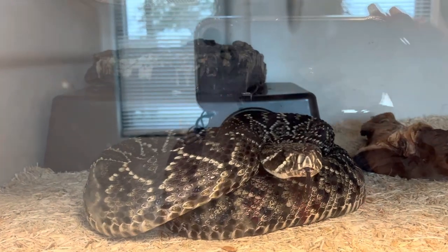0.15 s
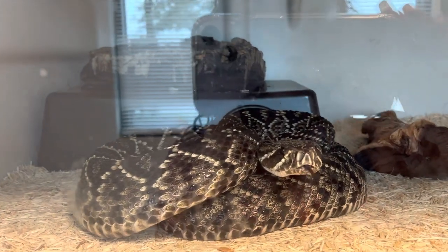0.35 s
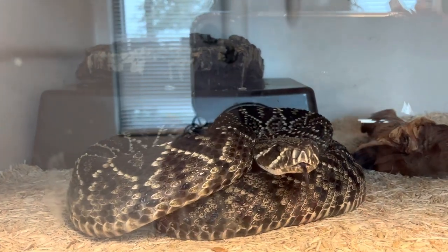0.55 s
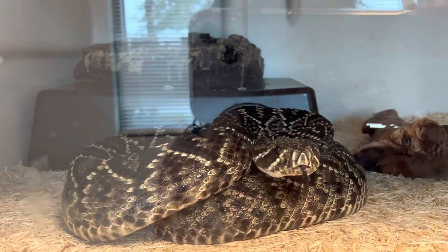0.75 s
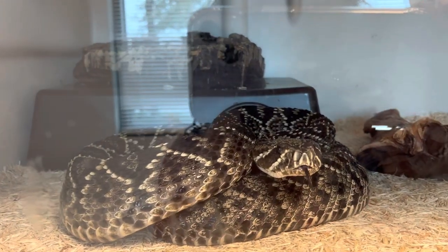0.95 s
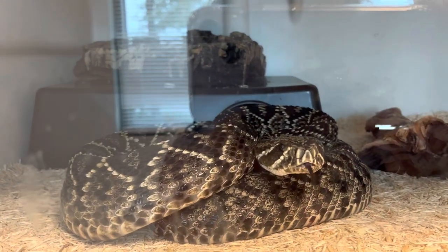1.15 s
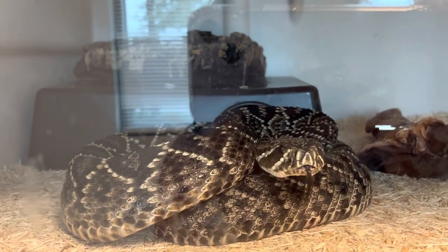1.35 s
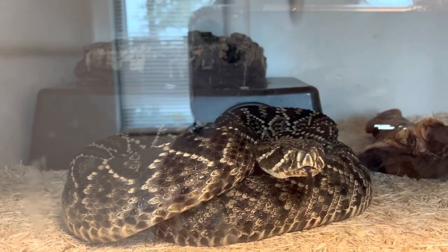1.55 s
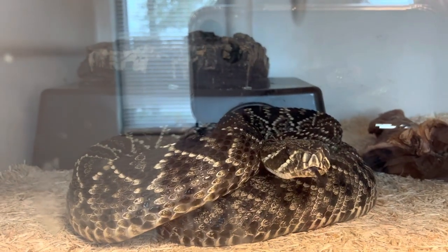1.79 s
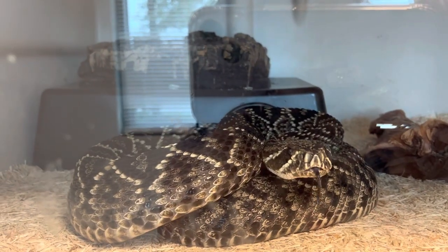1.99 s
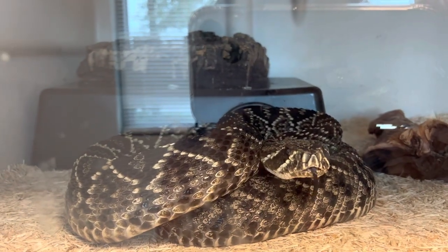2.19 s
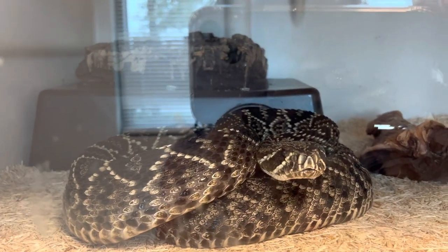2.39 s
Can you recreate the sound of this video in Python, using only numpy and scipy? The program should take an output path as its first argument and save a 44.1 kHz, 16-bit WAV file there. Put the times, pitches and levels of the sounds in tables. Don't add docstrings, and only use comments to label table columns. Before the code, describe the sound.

A rattlesnake's tail rattles without pause, a fast dry fluttering buzz close up in a glass tank

```python
import sys
import numpy as np
from scipy import signal
from scipy.fft import rfft, irfft, next_fast_len
from scipy.io import wavfile
from scipy.ndimage import uniform_filter1d

SR = 44100
rng = np.random.default_rng(int(sys.argv[2]) if len(sys.argv) > 2 else 0)


def store_wav(level_fs):
    pcm = np.round(np.clip(np.atleast_2d(level_fs), -1, 1) * 32767)
    wavfile.write(sys.argv[1], SR, pcm.T.astype(np.int16))


def volts_from_decibels(level):
    exponent = np.asarray(level, float) / 20
    return 10 ** exponent


N = 107163

# pitch_hz, level_db
HUM_TONES = [(120, -66), (180, -72), (300, -79), (420, -79), (480, -83)]
# frequency_hz, density_db (per Hz)
AIR_COLOUR = [(25, -37), (54, 1.5), (110, -6.5), (200, -13.5), (650, -41.5), (1050, -23), (1500, -30.5),
              (6000, -26.5)]
# pitch_hz, width_hz, level_db
DUCT_MODES = [(142.7, 11, -0.5), (162.4, 6.3, -4.5), (287.3, 9.9, -11.5), (1587, 49, -18.5)]
# frequency_hz, left_lead_rad
PORT_LEAD = [(0, 0), (550, 0), (800, -1.2), (1300, -1.4), (1800, -6.1), (3000, -5.5), (3500, -5.7),
             (4300, .4), (5200, 0), (5700, -1.9), (6300, .3), (7000, 0), (10000, -3.14), (15800, -9.42)]
# frequency_hz, left_minus_right_db
PORT_BALANCE = [(60, 0), (200, 1.5), (1300, 2.5), (2600, 0), (3300, 0), (3900, 4.5), (5300, 2), (6000, 0)]
# start_s, swings_per_s, level_db, swing_depth (times DEPTH_DB)
TAIL_EFFORT = [(0.0, 20.95, -2.2, 0.97), (0.14, 20.27, -1.7, 1.48), (0.29, 21.2, -0.4, 1.35),
               (0.43, 21.42, 0.2, 0.93), (0.57, 21.49, 0.6, 0.88), (0.71, 23.21, 0.3, 0.9),
               (0.86, 21.85, 1.7, 0.9), (1.0, 21.77, -0.1, 0.72), (1.14, 22.08, 0.8, 0.87),
               (1.29, 21.23, 0.7, 1.14), (1.43, 22.09, -0.1, 0.84), (1.57, 20.33, 0.8, 1.07),
               (1.72, 20.85, -0.4, 0.79), (1.86, 21.48, 1.0, 1.11), (2.0, 22.23, 1.3, 0.85),
               (2.14, 20.62, -0.4, 1.2), (2.29, 20.35, -0.6, 1.05), (2.43, 20.74, -1.5, 0.96)]
# start_s, level_db
HARD_CLASHES = [(0.1845, -38), (0.2289, -33.5), (0.323, -33.5), (0.383, -29), (0.5104, -32),
                (0.6545, -34.5), (0.7843, -32.5), (0.828, -35), (0.965, -34), (1.0557, -33), (1.1483, -38),
                (1.1914, -38), (1.239, -28), (1.4262, -34.5), (1.5193, -40), (1.5687, -41), (1.6168, -32),
                (1.7104, -31.5), (1.8523, -32), (1.9, -37.5), (2.0357, -36), (2.1342, -36.5), (2.228, -39),
                (2.278, -39)]
SHELL_GROUPS_HZ = [1800, 2900, 4000, 5200, 7500, 11000, 14500]
# frequency_hz, level_db
CLICK_COLOUR = [(1300, -30), (2100, -23), (2750, -2.5), (3900, -2), (5300, -3), (6300, -12), (8700, -7),
                (15500, -14)]
# pitch_hz, level_db, t60_s
RING_MODES = [(2389, -7.5, 0.039), (2725, -8, 0.05), (2798, 0, 0.047), (2930, -5, 0.065), (3127, -5, 0.054),
              (3220, -3, .06), (3610, -9.5, 0.045), (3900, 3.5, .06), (4113, -0.5, 0.05), (4390, -22, .06),
              (4630, -2.5, 0.055), (4860, -6, 0.05), (5038, 0, 0.089), (5773, 3.5, 0.072)]
PANE_DELAYS_MS = [1.3, 2.3, 3.7]
# frequency_hz, level_db
ECHO_COLOUR = [(1500, 3), (5600, 2), (6500, -19), (15000, -36)]

AIR_DB, DUCT_DB, RATTLE_DB = -49.5, -55, -43.5
RISE_AT, RISE = 0.64, 0.12
DEPTH_DB, SWING_SCATTER_DB = 10, 0.68
CLICKS_PER_S, CLICK_SCATTER_DB = 6000, 2.5
CLASH_DB, CLASH_DECAY_S = 35, 0.0036
SHARED_KNOCKS, WANDER_DB, WANDER_PER_S = 0.48, 1.5, 14
RING_DB, ECHO_DB, ECHO_T60_S = -5.5, -2.5, 0.074
PANE_GAIN = 0.59


def curve(f, table):
    hz, value = np.array(table).T
    return np.interp(np.log(f + 1), np.log(hz + 1), value)


def level(x, db):
    return x * volts_from_decibels(db) / np.sqrt(np.mean(x ** 2))


def colour(x, gain):
    n = next_fast_len(N + SR // 2)
    f = np.arange(n // 2 + 1) * SR / n
    return irfft(rfft(x, n) * gain(f), n)[..., :N]


def walk(rate):
    hold = int(SR / rate)
    steps = np.repeat(rng.standard_normal(N // hold + 1), hold)
    slewed = uniform_filter1d(uniform_filter1d(steps, hold), hold)
    return 0.93 * slewed[:N]


def ports(x):
    def half(f):
        phase = np.interp(f, *np.array(PORT_LEAD).T)
        return volts_from_decibels(curve(f, PORT_BALANCE) / 2) * np.exp(0.5j * phase)

    left = colour(x, half)
    right = colour(x, lambda f: 1 / half(f))
    return np.array([left, right])


def hum():
    t = np.arange(N) / SR
    tones = 0
    for hz, db in HUM_TONES:
        tones = tones + volts_from_decibels(db) * np.sqrt(2) * np.sin(2 * np.pi * (hz * t + rng.random()))
    return tones * np.array([[1], [-0.63]])


def room():
    noise = rng.standard_normal((4, N))
    air = colour(noise[:2], lambda f: volts_from_decibels(curve(f, AIR_COLOUR)))
    duct = colour(noise[2:], lambda f: sum(volts_from_decibels(db) / (1 + 2j * (f - hz) / width)
                                           for hz, width, db in DUCT_MODES))
    mid, side = level(air, AIR_DB) * volts_from_decibels(walk(3.15)) + level(duct, DUCT_DB)
    side = colour(side, lambda f: np.clip(f / 440, 0.05, 3) ** 0.33 * 0.3)
    return ports(mid) + side * np.array([[1], [-1]])


def swing():
    t = np.arange(N) / SR
    start, rate, effort_db, depth = np.array(TAIL_EFFORT).T
    turns = np.cumsum(np.interp(t, start, rate)) / SR + 1 - RISE_AT
    phase = turns % 1
    shape = np.minimum(phase / RISE, (1 - phase) / (1 - RISE))
    luck = rng.standard_normal(N // 1000)
    each_swing = np.interp(turns - RISE, np.arange(len(luck)), luck)
    fall_db = DEPTH_DB * np.interp(t, start, depth) * (shape - 0.5)
    return volts_from_decibels(np.interp(t, start, effort_db) + fall_db + SWING_SCATTER_DB * each_swing)


def clashes():
    t = np.arange(N) / SR
    force = 0
    for start, db in HARD_CLASHES:
        decay = np.exp(-np.maximum(t - start, 0) / CLASH_DECAY_S)
        force = force + volts_from_decibels(db + CLASH_DB) * (t >= start) * decay
    return force


def clicks(force):
    hit = rng.random(N) < CLICKS_PER_S / SR
    sign = np.sign(rng.standard_normal(N))
    return force * hit * sign * volts_from_decibels(CLICK_SCATTER_DB * rng.exponential(size=N))


def shells(force):
    common, out = clicks(force), 0
    for group in np.eye(len(SHELL_GROUPS_HZ)):
        knocks = SHARED_KNOCKS * common + (1 - SHARED_KNOCKS) * clicks(force)
        knocks = knocks * volts_from_decibels(WANDER_DB * walk(WANDER_PER_S))
        out = out + colour(knocks, lambda f: np.sqrt(np.interp(f, SHELL_GROUPS_HZ, group))
                           * volts_from_decibels(curve(f, CLICK_COLOUR)))
    return level(out, 0)


def ring(x, hz, t60):
    r = np.exp(-np.log(1000) / (t60 * SR))
    turn = 2 * np.pi * hz / SR
    return signal.lfilter([np.sqrt(1 - r * r) * np.sin(turn)], [1, -2 * r * np.cos(turn), r * r], x)


def ringing(force):
    rings = 0
    for hz, db, t60 in RING_MODES:
        knocks = clicks(force) * volts_from_decibels(2.0 * walk(9.08))
        rings = rings + volts_from_decibels(db) * ring(knocks, hz, t60)
    return colour(level(rings, RING_DB), lambda f: 1 / (1 + (2000 / (f + 1)) ** 8))


def panes(f):
    turn = np.exp(-2j * np.pi * f * np.array(PANE_DELAYS_MS)[:, None] / 1000)
    return np.prod((turn - PANE_GAIN) / (1 - PANE_GAIN * turn), axis=0)


def tail(t60, count):
    t = np.arange(SR // 4) / SR
    x = rng.standard_normal((count, len(t))) * np.exp(-np.log(1000) * t / t60)
    return x / np.sqrt(np.mean(np.sum(x ** 2, axis=1)))


def rattle():
    force = swing() + clashes()
    near = ringing(force) + shells(force)
    source = colour(near, lambda f: volts_from_decibels(curve(f, ECHO_COLOUR)))
    echo = signal.fftconvolve(source[None], tail(ECHO_T60_S, count=2), axes=1)[:, :N]
    direct = ports(colour(near, panes))
    return level(direct + volts_from_decibels(ECHO_DB) * echo, RATTLE_DB)


def scene():
    return hum() + room() + rattle()


def band_limit(x):
    return signal.sosfilt(signal.butter(12, 15750, fs=SR, output="sos"), x)


def record(dry):
    return band_limit(dry)


dry = scene()
out = record(dry)
store_wav(out)
```